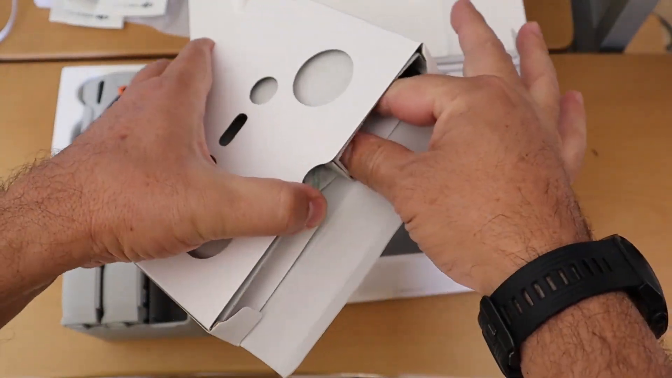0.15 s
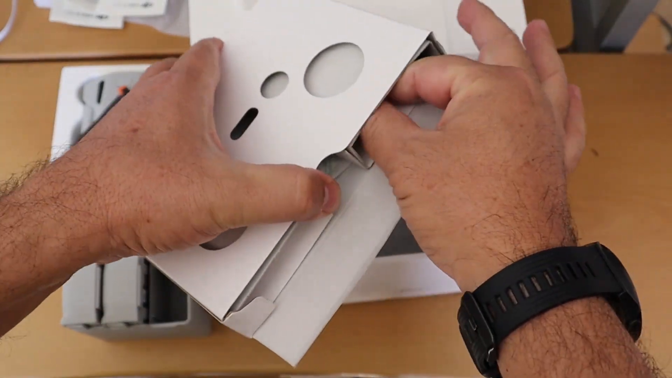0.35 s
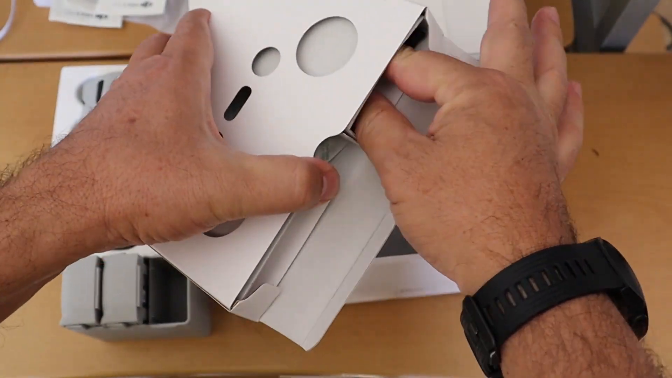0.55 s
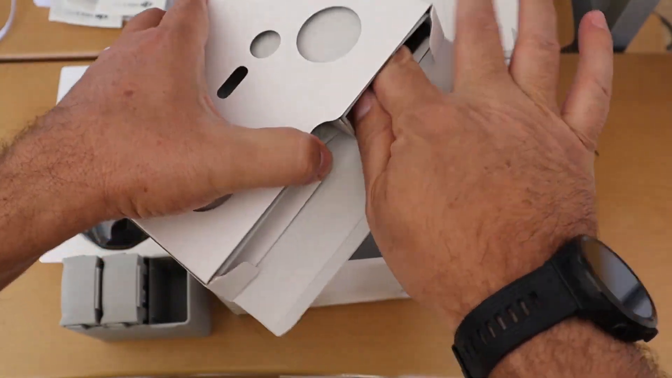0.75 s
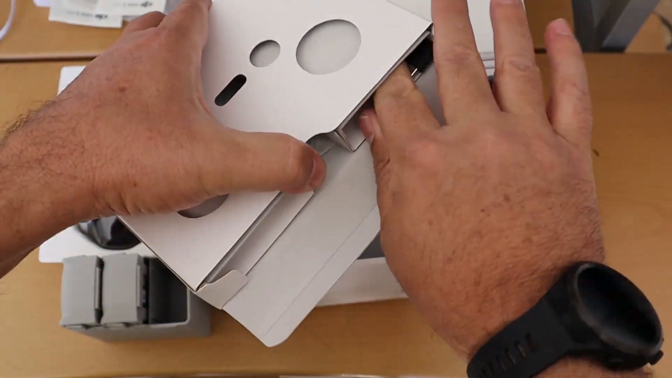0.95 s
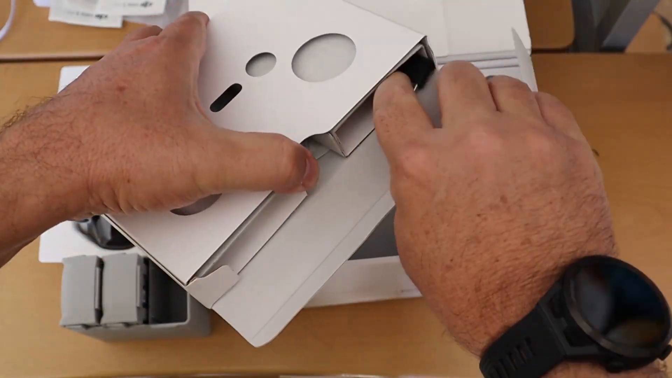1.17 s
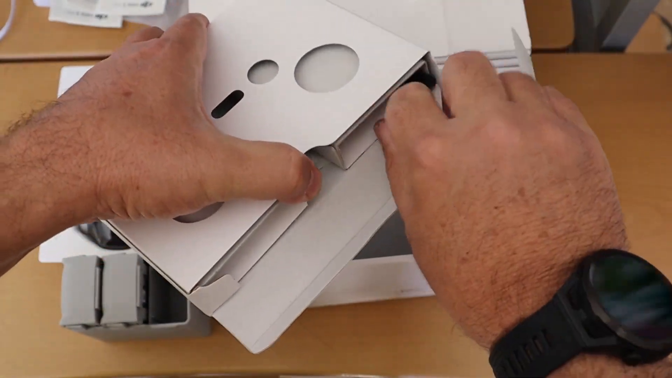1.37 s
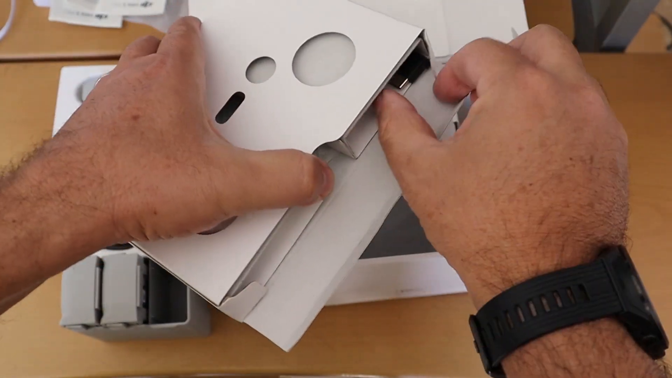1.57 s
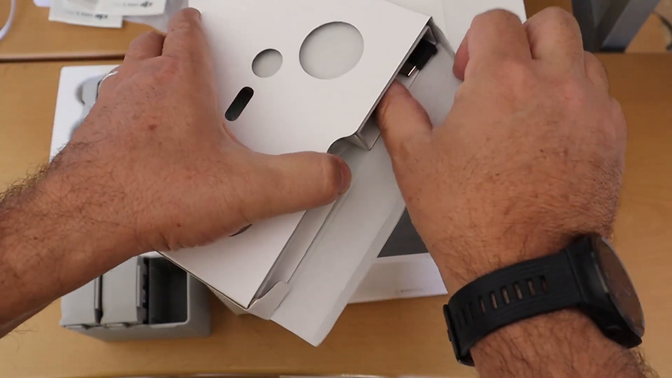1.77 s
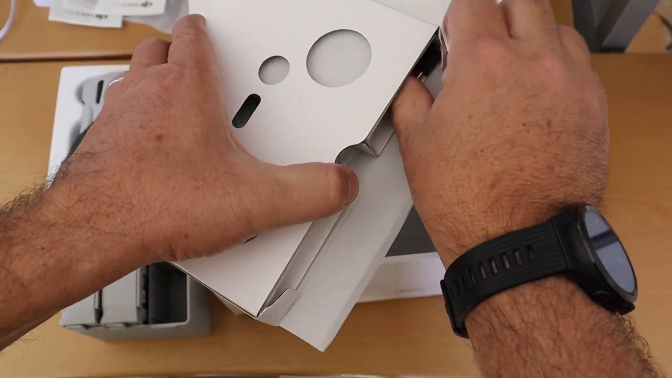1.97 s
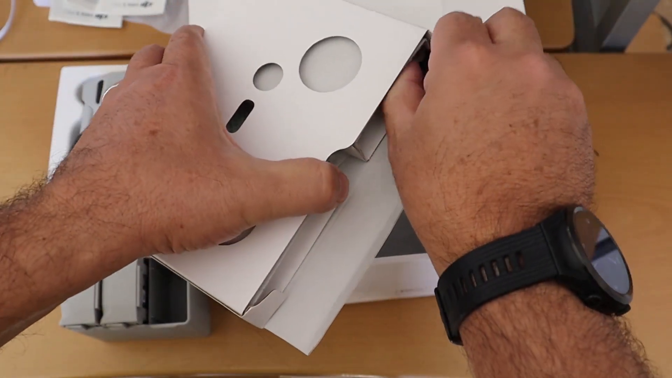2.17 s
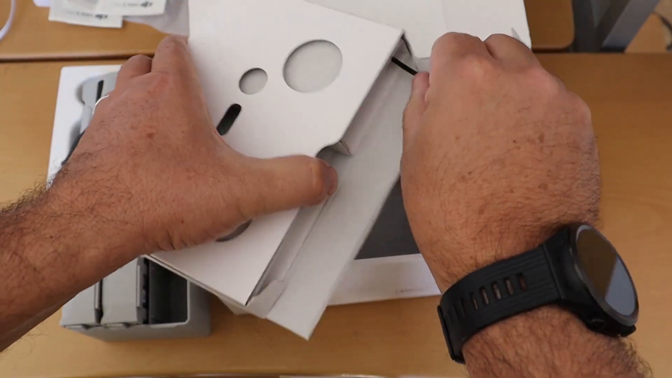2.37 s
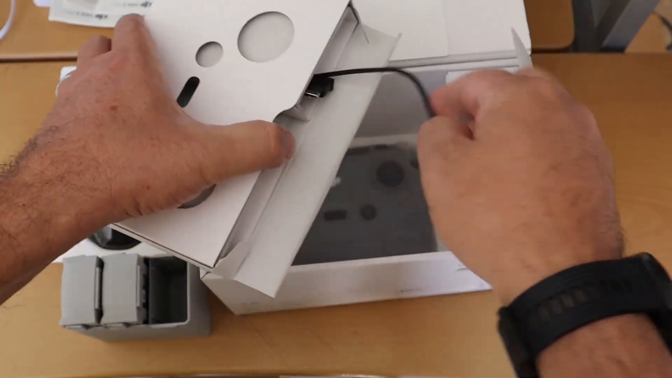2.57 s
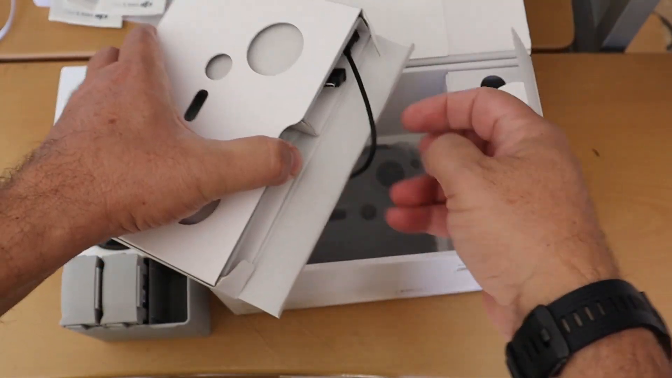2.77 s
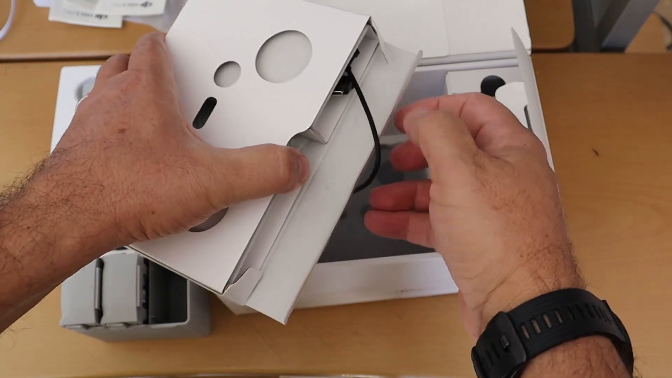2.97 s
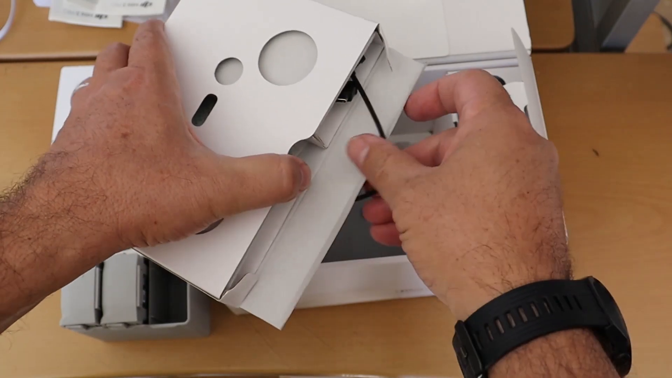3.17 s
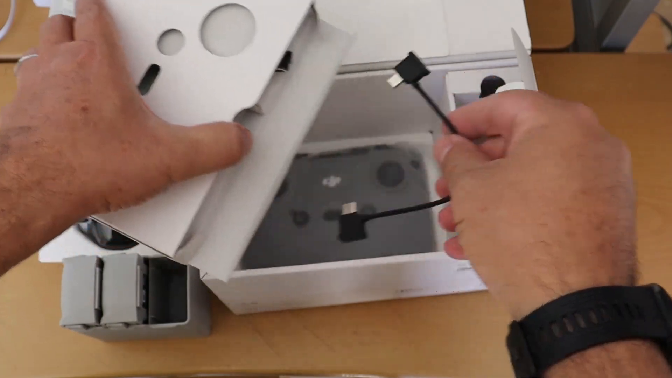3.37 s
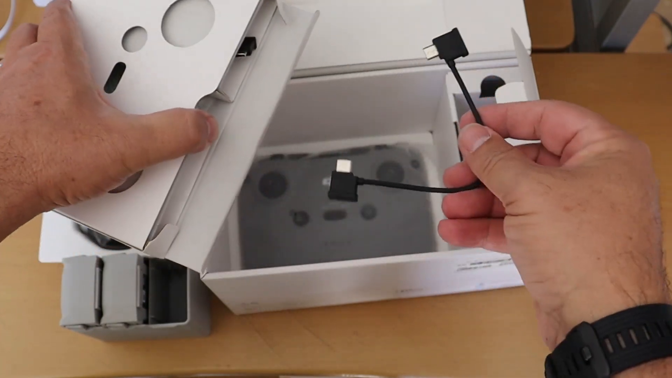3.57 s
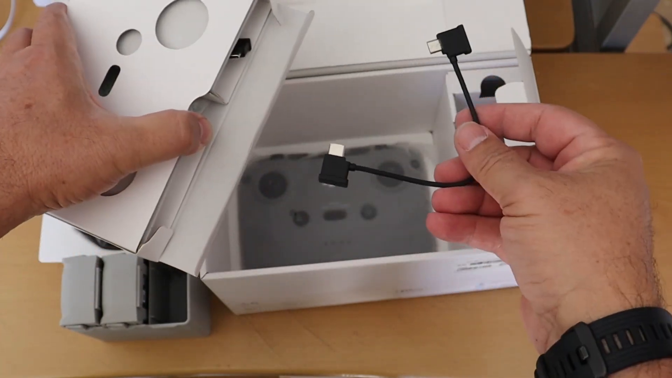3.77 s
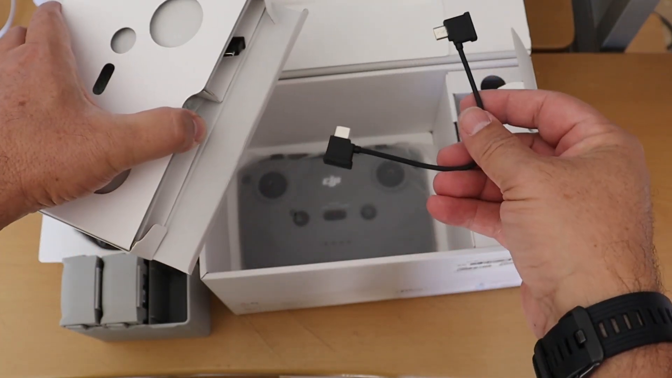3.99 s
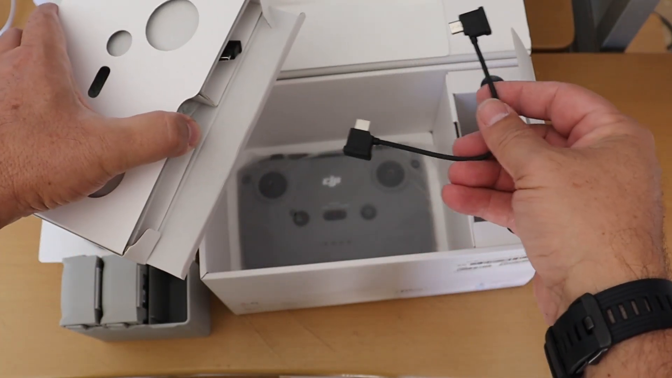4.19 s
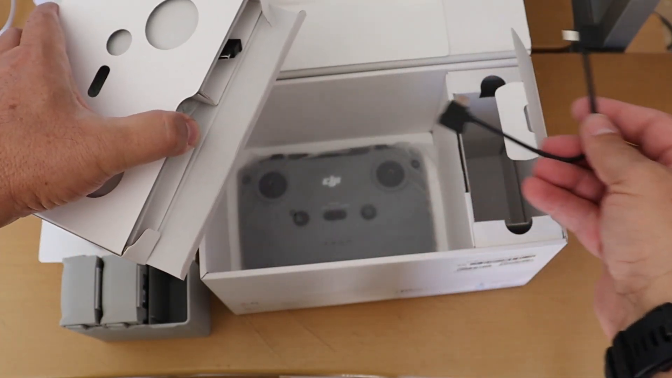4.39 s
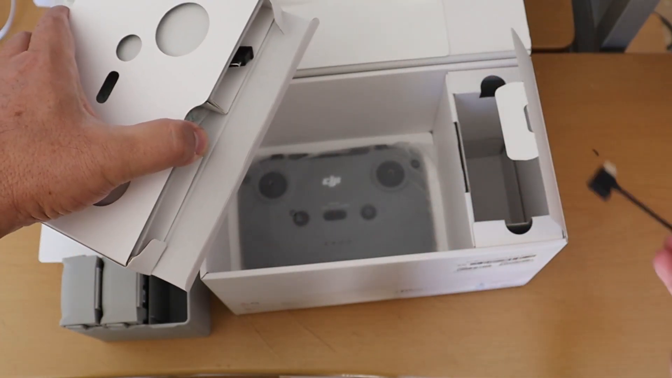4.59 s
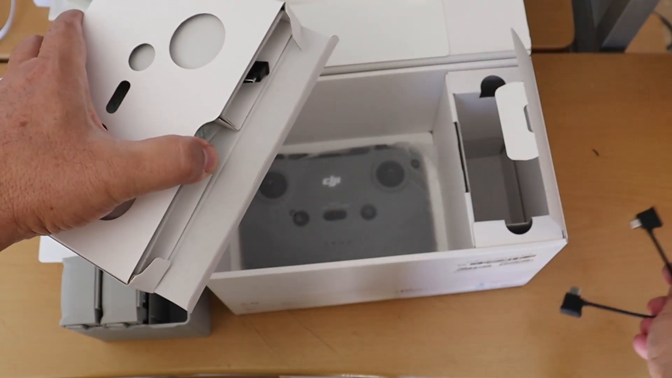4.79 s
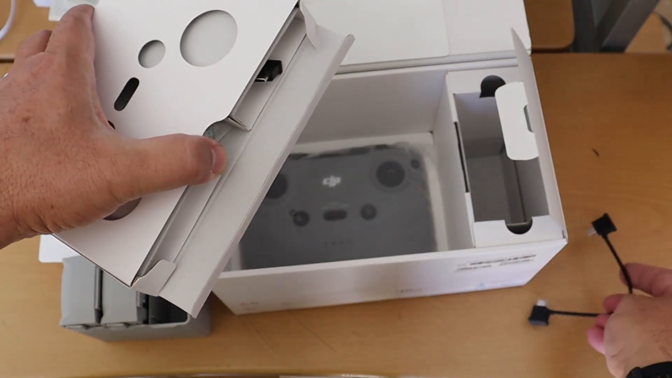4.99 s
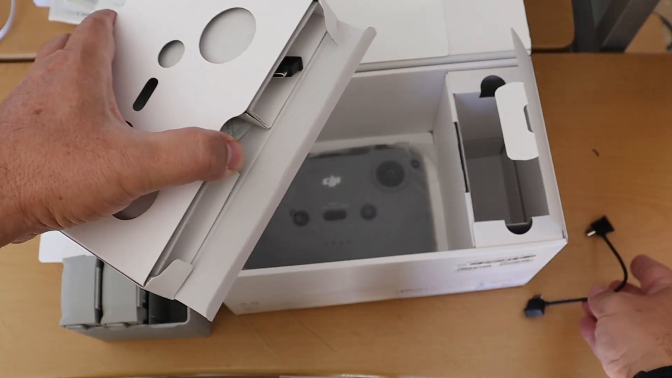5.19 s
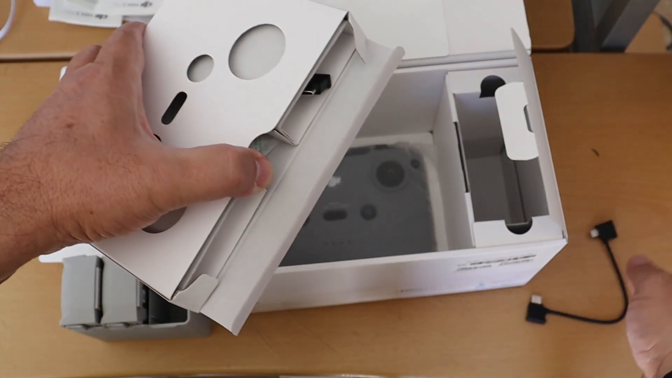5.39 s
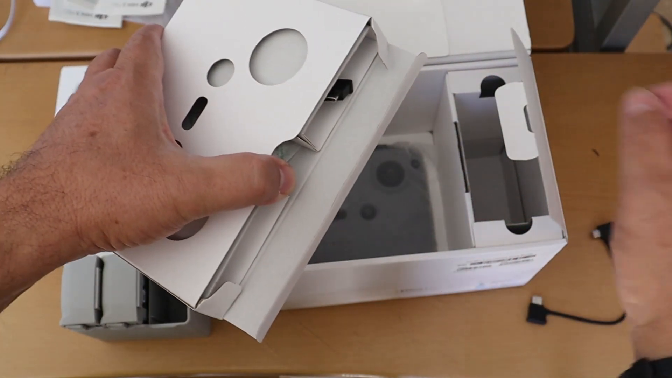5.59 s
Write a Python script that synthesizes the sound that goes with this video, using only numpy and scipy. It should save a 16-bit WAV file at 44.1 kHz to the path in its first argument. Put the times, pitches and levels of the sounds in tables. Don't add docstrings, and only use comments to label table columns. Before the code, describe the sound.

Close-up hands work a short cable out of a folded cardboard insert: dry rubbing, nail scrapes, flap snaps, knocks and crease cracks, growing busier until it tears free near 2.8 seconds. More loud snaps follow near 3.3, then faint cable slides and near quiet. Plugs clack on a wooden table at 5.1, with a last slip and click. Close microphone, live small room, faint rumble and hiss.

```python
import sys
import numpy as np
from scipy import signal
from scipy.fft import rfft, irfft
from scipy.io import wavfile

SR = 44100
rng = np.random.default_rng(int(sys.argv[2]) if len(sys.argv) > 2 else 0)


def store_wav(level_fs):
    pcm = np.round(np.clip(np.atleast_2d(level_fs), -1, 1) * 32767)
    wavfile.write(sys.argv[1], SR, pcm.T.astype(np.int16))


def elevation(decibels):
    levels = np.asarray(decibels, float)
    return 10 ** (levels / 20)


N = 248724

# start in seconds, length in seconds, hiss level in dB,
# card body relative to the hiss in dB.
STROKES = [(0.235, 0.11, -37.5, 0.5), (0.325, 0.22, -41, -0.5), (0.44, 0.013, -47, -7),
           (0.765, 0.089, -28.5, -2), (1.03, 0.14, -33.5, -4), (1.22, 0.09, -38, -5.5),
           (1.595, 0.041, -29.5, -5), (2.255, 0.083, -30.5, 0.5), (2.395, 0.093, -33.5, -1.5),
           (2.8, 0.017, -44, -7), (3.25, 0.17, -38, 0.5), (2.645, 0.027, -40, -9)]
JERKS = [
    (0, 0.082, -41.5, 4),
    (0.485, 0.17, -40.5, 1.5),
    (0.645, 0.1, -41, 3.5),
    (0.84, 0.16, -35, -4.5),
    (1.305, 0.15, -44, 4.5),
    (1.433, 0.035, -30, -2),
    (1.84, 0.12, -42, 9),
    (2.125, 0.17, -44.5, -2.5),
]
PULLS = [
    (0.71, 0.054, -31.5, -3),
    (1.645, 0.2, -44.5, 5.5),
    (2.055, 0.051, -33, -1.5),
    (2.59, 0.028, -30, -4),
    (2.635, 0.013, -46, 18.5),
    (2.725, 0.045, -24.5, -1),
    (2.897, 0.039, -33.5, 0),
]
SCUFFS = [
    (0.084, 0.0095, -30, 3),
    (0.398, 0.033, -32.5, -1),
    (1.46, 0.046, -27, -3),
    (2.48, 0.072, -34, 8.5),
    (2.535, 0.087, -27.5, -8),
    (3.33, 0.051, -38.5, 9),
]
# start in seconds, length in seconds,
# hiss level in dB, share of the length spent rising, sheen relative to the hiss in dB.
SLIDES = [
    (1.896, 0.033, -22, 0.061, -20),
    (3.109, 0.21, -38.5, 0.58, -11.5),
    (3.32, 0.08, -38.5, 0.68, -15),
    (3.403, 0.52, -54.5, 0.31, -16),
    (3.754, 0.29, -43.5, 0.63, -13.5),
    (4.014, 0.42, -49, 0.093, -15),
    (5.487, 0.11, -31, 0.05, -36),
]

# start in seconds, peak level in dB, ring in Hz, contact length in seconds.
SNAPS = [(0.402, -23, 930, 0.0027), (0.422, -22, 910, 0.0012), (0.506, -17.5, 880, 0.0039),
         (1.436, -7, 1620, 0.0029), (1.568, -9, 2000, 0.003), (1.722, -13.5, 921, 0.0098),
         (1.904, 1.5, 1400, 0.00083), (2.082, -23, 523, 0.0035), (2.252, -9, 1450, 0.003),
         (2.441, 1.5, 3010, 0.0025), (2.454, -24, 3000, 0.0017), (2.53, -5, 2600, 0.0024),
         (2.997, -37.5, 1170, 0.0026), (3.115, -32, 1010, 0.003), (3.3, -3, 3130, 0.0032),
         (3.327, -3, 1700, 0.0045), (3.383, -5.5, 1590, 0.0024), (3.39, -13, 1060, 0.0031)]
KNOCKS = [(0.085, -20, 1640, 0.0038), (0.229, -33.5, 1330, 0.0044), (0.349, -21, 966, 0.0046),
          (0.404, -12, 880, 0.0062), (1.103, -27.5, 2800, 0.0068), (1.293, -21.5, 970, 0.0052),
          (1.444, -11.5, 1750, 0.0024), (1.541, 1, 1930, 0.0022), (1.741, -18.5, 1240, 0.0047),
          (2.207, -22.5, 1390, 0.009), (2.584, -12.5, 1100, 0.0025), (2.602, -15, 3550, 0.003),
          (2.672, -12.5, 1710, 0.0082), (2.708, -17, 1110, 0.009), (2.949, -16.5, 1240, 0.0021),
          (2.981, -18.5, 895, 0.0048), (3.232, -21.5, 1050, 0.0062), (3.302, 0.5, 1124, 0.0011)]
CRACKS = [(0.092, -13, 910, 0.0035), (0.107, -16, 1010, 0.0027), (0.466, -6.5, 2220, 0.0011),
          (1.092, -19, 3020, 0.0036), (1.492, -14, 2390, 0.0018), (1.616, -15, 1130, 0.0033),
          (1.9, -4, 2030, 0.0021), (2.233, -23.5, 1260, 0.021), (2.612, -12.5, 1090, 0.0024),
          (3.291, -13.5, 1220, 0.022), (1.517, -20, 930, 0.0016), (3.591, -38, 7500, 0.001),
          (2.524, -6, 3500, 0.0036)]
THUMPS = [
    (0.267, -28.5, 890, 0.0038),
    (0.292, -20.5, 1080, 0.0024),
    (0.71, -31, 1330, 0.003),
    (1.475, -21.5, 1700, 0.0042),
    (1.622, -18.5, 890, 0.0075),
]
TEARS = [
    (2.7648, -3.5, 1200, 0.0027),
    (2.7695, -4, 3060, 0.0024),
    (2.7785, -1.5, 1080, 0.0033),
    (2.781, -6, 2600, 0.0035),
    (2.792, -6.5, 1100, 0.0018),
    (2.799, -26.5, 1300, 0.0022),
]
DROPS = [
    (5.1165, -11, 1050, 0.0036),
    (5.1205, -10, 1700, 0.0039),
    (5.196, -15.5, 910, 0.0017),
    (5.217, -18, 1300, 0.0038),
]
FLICKS = [
    (5.490, -20.5, 2960, 0.0092),
    (5.4965, -13.5, 4100, 0.0022),
]

# centre in Hz, width in Hz, level in dB.
CARD = [(197.5, 80, -6), (336, 180, -0.5), (558, 121, 3.5), (820, 140, 7.5), (1160, 416, 9.5),
        (1545, 480, 8.5), (1864, 290, 10), (2740, 3100, -2.5), (3493, 470, 8), (6740, 970, 1.5)]
TABLE = [(277, 37, -1), (465, 120, -2), (960, 230, -14), (1360, 310, 9.5), (1700, 690, -1),
         (2200, 300, 2.5), (3520, 5400, -10), (6400, 76, -31)]

# frequency in Hz, level in dB per Hz.
NAIL = [(1350, -35), (2300, -5), (2970, 0), (3260, -4), (4140, -1), (4560, -6), (4970, -6), (6920, -1),
        (9000, -14), (11700, -44), (19800, -120)]
RASP = [(4820, -30), (8200, 0), (10000, -5), (12500, -8), (15000, -7), (16000, -15), (16400, -28)]
SKIN = [(1350, -31), (2300, -1), (2530, -6), (2860, -2), (3350, -3), (4510, 0), (6650, -8), (9000, -18),
        (11700, -48), (19800, -120)]
SHEEN = [(4820, -30), (8200, 0), (9180, -5), (14700, -15), (16100, -21), (16400, -34)]
FLOOR = [(180, -16.7), (450, 0.5), (700, -1.8), (1000, -4.0), (1500, -4.8), (2200, -5.4), (3200, -6.6),
         (4400, -6.4), (6000, -8.8), (8000, -11.9), (11000, -13.2), (15000, -15.2), (16000, -15.6)]
RUMBLE = [(12, -47), (20, -23), (43, -5.5), (87, -10), (222, -9), (242, -13), (278, -9.5), (400, -17),
          (520, -46), (880, -120)]

# time in seconds, boom level in dB.
BOOM_SWELLS = [(0.02, -47), (0.28, -46), (0.49, -53), (0.67, -53), (0.79, -48), (1.11, -52), (1.47, -44),
               (1.63, -47), (1.87, -43), (2.14, -54), (2.31, -50), (2.57, -38), (2.63, -36.5), (2.77, -46.5),
               (3.05, -53), (3.68, -49), (5.11, -43.5), (5.25, -46), (5.51, -51)]
# frequency in Hz, time to fall 60 dB in seconds.
ROOM = [(200, 0.45), (800, 0.72), (2000, 0.74), (5000, 0.79), (9000, 0.28), (15000, 0.097)]

CUTOFF_HZ = 16500


def rubbing(strokes, hiss, top, fibres, bluntness):
    body, skin, rasp = pressure(strokes, bluntness)
    signs = rng.choice([-1, 1], (2, N))
    shaken = rms_one(butter(body_of(fibres, CARD), 2600, "low"))
    hissing = coloured(fibres * signs[0], hiss)
    rasping = coloured(fibres * signs[1], top)
    return body * shaken + skin * hissing + rasp * rasping


def pressure(strokes, bluntness):
    power = np.zeros((3, N + SR))
    for s, length, rise, *levels_db in strokes:
        u = np.arange(round(length * SR)) / (length * SR)
        rise = np.clip(rise, .05, .95)
        swell = np.sin(np.pi / 2 * np.minimum(u / rise, (1 - u) / (1 - rise))) ** bluntness
        at = round(max(s, 0) * SR)
        power[:, at:at + len(u)] += elevation(2 * np.array(levels_db))[:, None] * swell ** 2
    return np.sqrt(power[:, :N])


def grains(per_s, spread_db, clump_db):
    sizes = elevation(spread_db * np.minimum(rng.exponential(1, N), 5)) * rng.choice([-1, 1], N)
    born = rng.random(N) < per_s / SR
    return rms_one(sizes * born * elevation(clump_db * drift(30.3))) + 1e-18


def moves(rows, rise, rasp_db):
    return [(s, length, rise, db + body_db, db, db + rasp_db) for s, length, db, body_db in rows]


def glides(rows, body_db):
    return [(s, length, rise, db + body_db, db, db + sheen_db) for s, length, db, rise, sheen_db in rows]


def knocks(events, modes, ring_q, body_db, soft_hz, first):
    size = 4096
    out, t = np.zeros(N + size), np.arange(size) / SR
    for s, peak_db, hz, thud_db, crack_db, length in events:
        crunch = rng.standard_normal(size) * np.exp(-t / max(length, 2e-4)) * np.minimum(t * 6000, 1)
        crunch[4] += first * np.sqrt(np.sum(crunch ** 2))
        push = butter(crunch, soft_hz, "low")
        panel = rms_one(resonate(push, hz, hz / ring_q))
        body = rms_one(body_of(push, modes))
        thud = rms_one(resonate_twice(crunch, 507, 570))
        crack = rms_one(butter(crunch, [5000, 11000], "band", order=1))
        hit = panel + elevation(body_db) * body + elevation(thud_db) * thud + elevation(crack_db) * crack
        at = round(s * SR)
        out[at:at + size] += elevation(peak_db) * hit / np.abs(hit).max()
    return out[:N]


def contacts(rows, thud_db, crack_db):
    return [(s, db, hz, thud_db, crack_db, length) for s, db, hz, length in rows]


def body_of(x, modes):
    return sum((-1) ** k * elevation(db) * resonate(x, hz, width) for k, (hz, width, db) in enumerate(modes))


def boom():
    boom_swell_s, rest_db = 0.037, -57
    lumps = rms_one(resonate_twice(rng.standard_normal(N), 92.4, 37))
    t = np.arange(N) / SR
    boom_swells = sum(elevation(db) * np.exp(-.5 * ((t - s) / boom_swell_s) ** 2) for s, db in BOOM_SWELLS)
    return elevation(-6.0) * (elevation(rest_db) + boom_swells) * lumps


def room(x):
    t = np.arange(SR) / SR
    noise = rng.standard_normal((2, SR))
    tail = sum(elevation(-60 * t / at_hz(ROOM, hz)) * band for hz, band in bands(noise, 118))
    tail *= np.clip((t - .004) / 0.0023, 0, 1)
    return signal.fftconvolve(x, tail / np.sqrt(np.sum(tail ** 2)))[:N]


def passing():
    centre_s, length_s = 4.68, 0.14
    swell = np.exp(-.5 * ((np.arange(N) / SR - centre_s) / length_s) ** 2)
    return elevation(-62) * swell * rms_one(resonate_twice(rng.standard_normal(N), 298, 260))


def distant_rumble():
    return elevation(-57 + 1.5 * drift(9.5)) * coloured(rng.standard_normal(N), RUMBLE)


def floor_hiss():
    return elevation(-56) * coloured(rng.standard_normal(N), FLOOR)


def rms_one(x):
    return x / np.sqrt(np.mean(x ** 2) + 1e-20)


def at_hz(points, hz):
    table_hz, values = np.transpose(points)
    return np.interp(np.log(hz), np.log(table_hz), values)


def drift(rate):
    r = np.exp(-80 * np.pi * rate / SR)
    noise = rng.standard_normal(N // 40 + 2002)
    slow = signal.lfilter([1], [1, -2 * r, r * r], noise)[2000:]
    return np.interp(np.arange(N) / 40, np.arange(len(slow)), rms_one(slow))


def resonate(x, hz, width_hz):
    r = np.exp(-np.pi * width_hz / SR)
    top = np.array([1, 0, -1]) * (1 - r * r) / 2
    return signal.lfilter(top, [1, -2 * r * np.cos(2 * np.pi * hz / SR), r * r], x)


def resonate_twice(x, hz, width_hz):
    return resonate(resonate(x, hz, width_hz), hz, width_hz)


def butter(x, hz, kind, order=2):
    return signal.sosfilt(signal.butter(order, hz, kind, fs=SR, output="sos"), x)


def bands(x, low_hz):
    count = round(3 * np.log2(CUTOFF_HZ / low_hz))
    edges = np.geomspace(low_hz, 1.1 * CUTOFF_HZ, count + 1)
    for k, (low, high) in enumerate(zip(edges, edges[1:])):
        yield np.sqrt(low * high), butter(x[k % len(x)], [low, high], "band")


def coloured(x, spectrum):
    hz = np.maximum(np.fft.rfftfreq(N, 1 / SR), 1)
    return rms_one(irfft(rfft(x) * elevation(at_hz(spectrum, hz)), N))


def scene():
    rubs = moves(STROKES, rise=0.42, rasp_db=-10.5) + moves(JERKS, rise=0.2, rasp_db=-10)
    rubs += moves(PULLS, rise=0.93, rasp_db=-8.5) + moves(SCUFFS, rise=0.62, rasp_db=-18)
    fibres = grains(per_s=7300, spread_db=2.0, clump_db=2.0)
    strokes = rubbing(rubs, NAIL, RASP, fibres, bluntness=0.74)
    slides = rubbing(glides(SLIDES, body_db=-6), SKIN, SHEEN, rng.standard_normal(N), bluntness=0.89)

    on_card = contacts(SNAPS, thud_db=-44.5, crack_db=-22)
    on_card += contacts(KNOCKS, thud_db=-6, crack_db=-25)
    on_card += contacts(CRACKS, thud_db=-13.5, crack_db=-6)
    on_card += contacts(THUMPS, thud_db=21.5, crack_db=-2)
    on_card += contacts(TEARS, thud_db=-6.5, crack_db=-21)
    on_table = contacts(DROPS, thud_db=-0.5, crack_db=-39)
    plug_on_plug = contacts(FLICKS, thud_db=-19, crack_db=-12)
    snaps = knocks(on_card, CARD, ring_q=6.5, body_db=-5, soft_hz=4930, first=.7)
    drops = knocks(on_table, TABLE, ring_q=3.5, body_db=3, soft_hz=3500, first=1.08)
    flicks = knocks(plug_on_plug, CARD, ring_q=2.9, body_db=-13, soft_hz=7000, first=0.34)

    sends = elevation(-13.5) * snaps + elevation(-3) * (drops + flicks) + elevation(-9.5) * strokes + elevation(-8.5) * slides
    near = strokes + slides + snaps + drops + flicks
    background = boom() + passing() + distant_rumble() + floor_hiss()
    return (near + room(sends) + background)[None]


def roll_off(x):
    return signal.sosfilt(signal.butter(12, 16520, fs=SR, output="sos"), x)


def record(dry):
    rounded = 1.3 * np.tanh(dry / 1.3)
    low_pass = signal.cheby2(12, 60, CUTOFF_HZ, fs=SR, output="sos")
    mix = signal.sosfilt(low_pass, rounded)
    return roll_off(mix)


dry = scene()
out = record(dry)
store_wav(out)
```